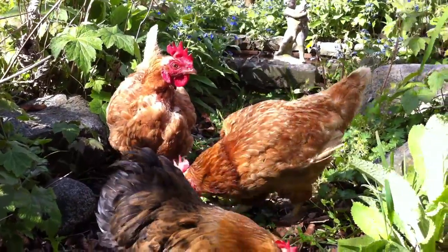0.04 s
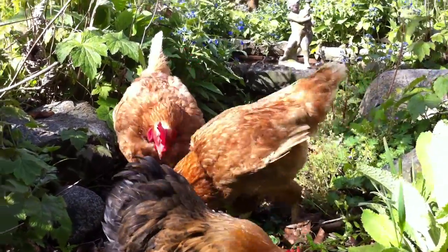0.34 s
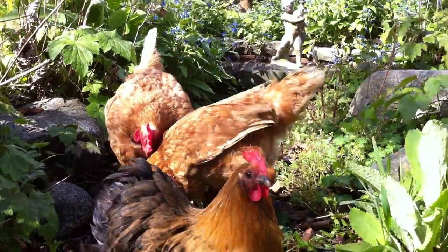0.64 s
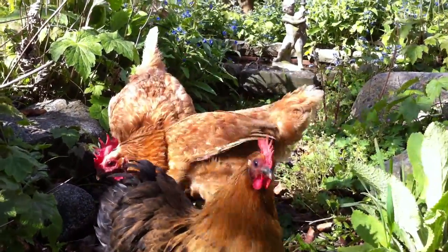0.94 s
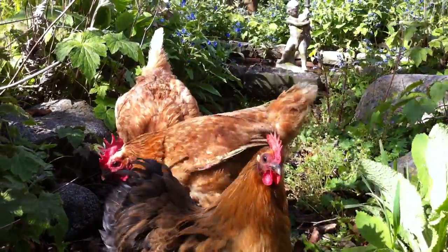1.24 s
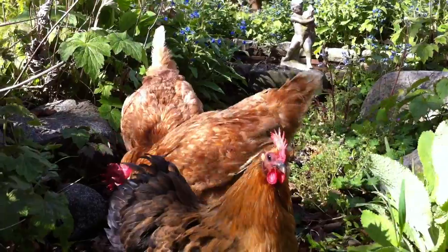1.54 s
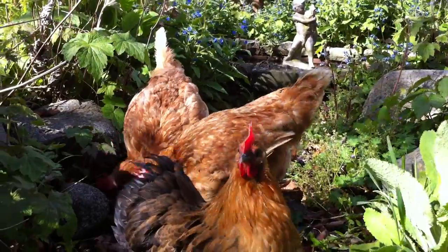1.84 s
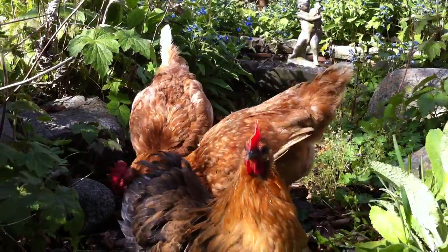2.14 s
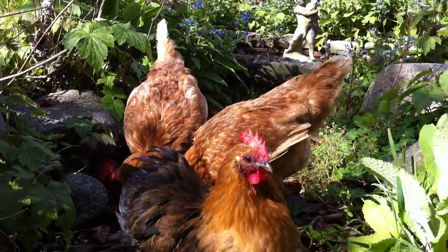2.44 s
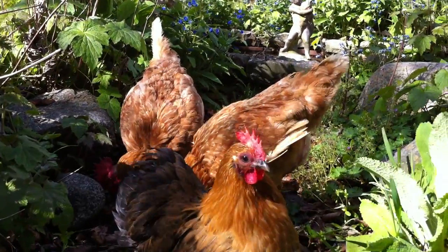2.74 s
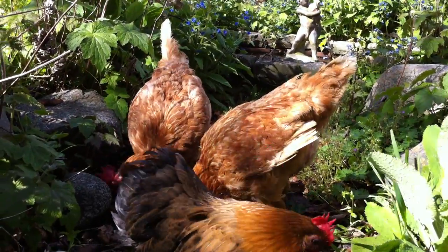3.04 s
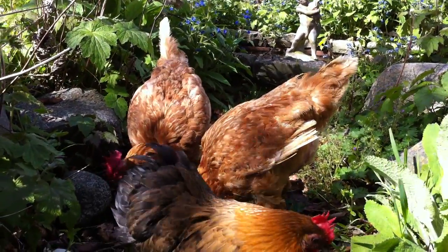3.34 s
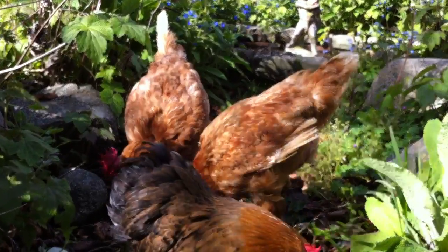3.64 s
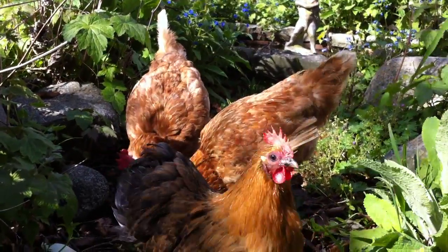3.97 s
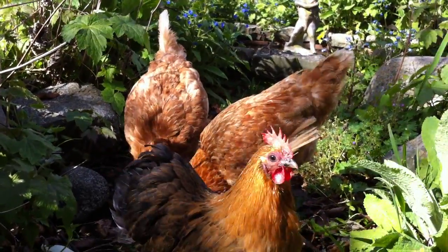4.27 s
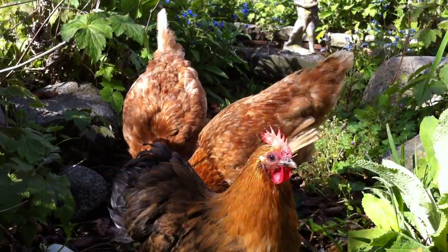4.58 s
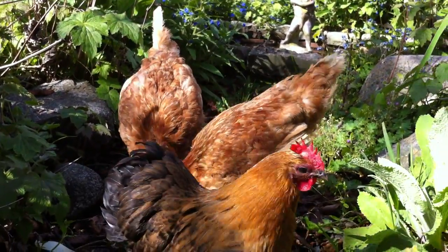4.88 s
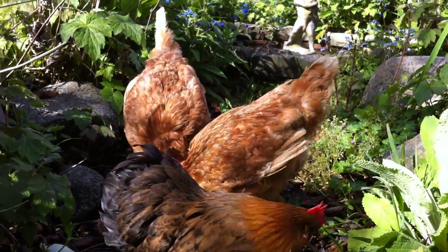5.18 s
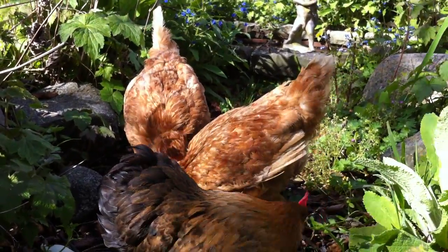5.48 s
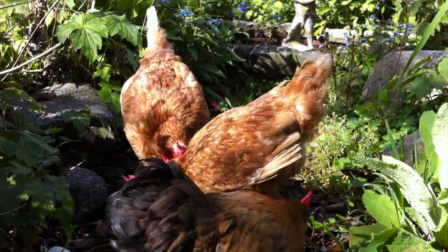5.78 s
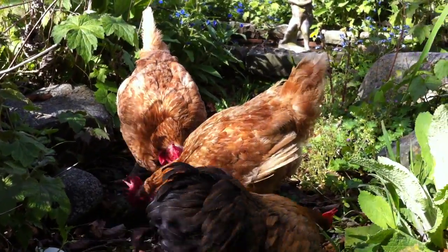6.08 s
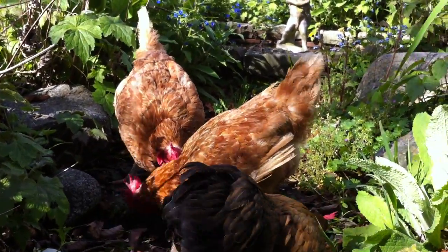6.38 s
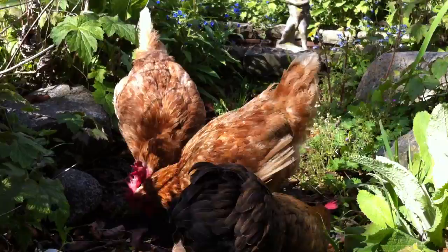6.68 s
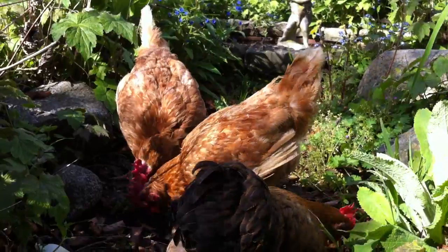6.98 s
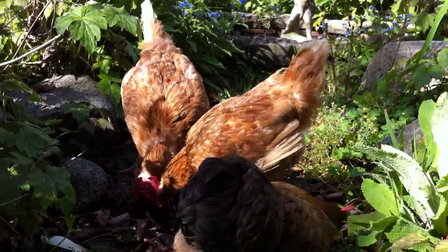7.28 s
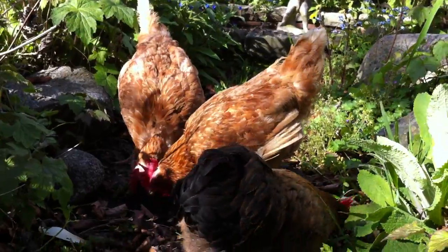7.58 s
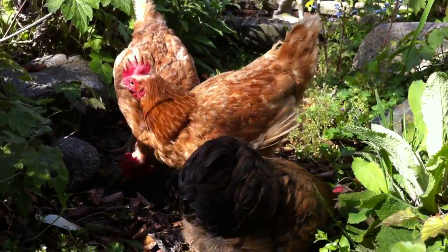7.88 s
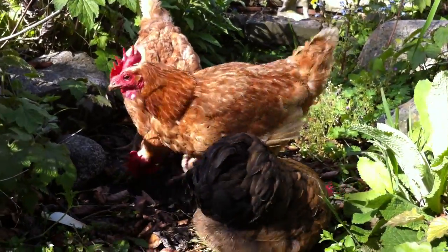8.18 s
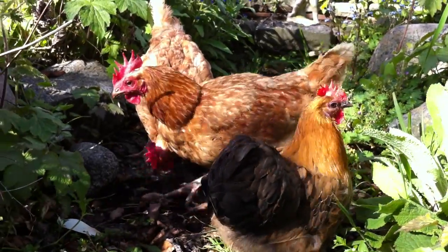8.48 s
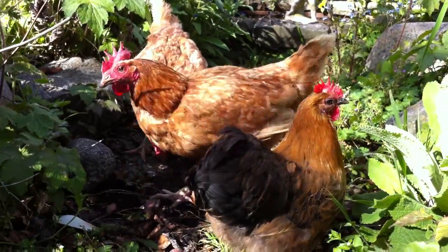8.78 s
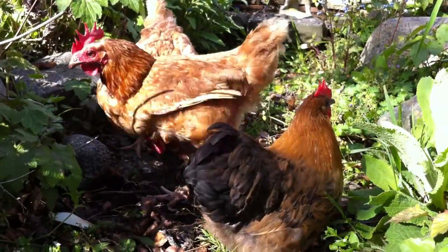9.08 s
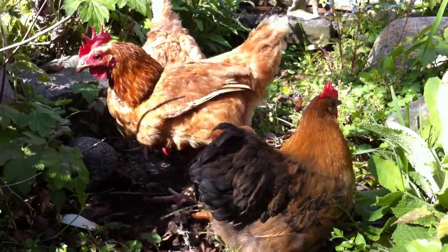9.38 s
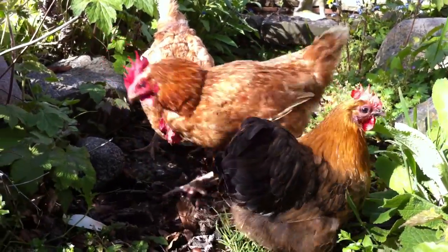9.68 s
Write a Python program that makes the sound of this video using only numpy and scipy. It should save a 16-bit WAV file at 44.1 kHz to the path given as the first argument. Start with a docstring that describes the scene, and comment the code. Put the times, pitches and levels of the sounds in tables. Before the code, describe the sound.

Hens feed in dry leaf litter in a garden, a step from a hand-held microphone, over soft outdoor air. For the first three seconds, light wind and handling make a run of low, dull thumps, while a faint, distant machine hum swells and holds. Around 1 second there is a crisp scratch and a sharp crack of a stalk, with a lighter brush of leaves near 2 seconds. From 3 to 5.4 seconds it is quiet, with soft rustling and an occasional tiny peck. Thumps return near 5.5 seconds and, more strongly, at 6.6 seconds; then the hum mostly fades. Small pecks and twig ticks are scattered from about 5.7 to 8 seconds. From 8.5 seconds until nearly 10, the hens rake hard in two short bouts, crackling the leaves, with brief ringing clicks of twigs and grit in the first.

```python
"""Hens feed in a garden, a step from a hand-held microphone. For the first three seconds light wind and
handling thump the microphone, while a far machine's hum swells and beaks and claws crack stalks and
scratch through dry leaves. After a stretch of soft rustling, thumps return near 5.5 and 6.6 s; then
the hum mostly fades. From 8.5 s the hens rake hard, crackling the leaves and making twigs and grit ring."""
import sys
import numpy as np
from scipy import signal
from scipy.fft import rfft, irfft
from scipy.io import wavfile
from scipy.ndimage import uniform_filter1d

SR = 44100
rng = np.random.default_rng(int(sys.argv[2]) if len(sys.argv) > 2 else 0)


def unload_audio(sound):
    """Save the sound as a 16-bit wav file, at the path given as the first command line argument."""
    columns = np.transpose(np.atleast_2d(sound))
    # keep every value between -1 and 1, then stretch to whole-number steps
    steps = np.round(np.clip(columns, -1, 1) * 32767)
    wavfile.write(sys.argv[1], SR, steps.astype(np.int16))


N = 433062
T = np.arange(N) / SR
HUM_FADE_AT_S, HUM_FADE_TAKES_S = 6.7, 0.26


def amp(db):
    """Decibels to gain."""
    return 10 ** (np.asarray(db) / 20)


def unit_rms(x):
    """Scales to rms 1."""
    return x / np.sqrt(np.mean(x ** 2) + 1e-20)


def level_at(spectrum, hz):
    """Level in dB of a spectrum table, its points joined on a log-frequency axis."""
    points_hz, db = np.transpose(spectrum)
    return np.interp(np.log(hz + 1), np.log(points_hz + 1), db)


def add(mix, at_s, sound):
    """Mixes a sound in at a time."""
    part = mix[max(round(at_s * SR), 0):][:len(sound)]
    part += sound[:len(part)]


def colour(x, spectrum, size=8192):
    """Minimum-phase filter with the shape of a spectrum table."""
    db = level_at(spectrum, abs(np.fft.fftfreq(size, 1 / SR)))
    log_gain = np.log(amp(np.maximum(db - db.max(), -90)))
    response = np.exp(np.conj(signal.hilbert(log_gain)))
    taps = np.fft.ifft(response).real[:size // 2]
    return signal.oaconvolve(x, taps)[:len(x)]


def band(x, hz, kind, order=2):
    """Butterworth filter."""
    sections = signal.butter(order, np.clip(hz, 5, SR / 2 - 500), kind, fs=SR, output="sos")
    return signal.sosfilt(sections, x)


def low_part(x, hz):
    """Everything below hz, with no delay."""
    return irfft(rfft(x) / (1 + (np.fft.rfftfreq(N, 1 / SR) / hz) ** 4), N)


def wander(rate_hz):
    """Smooth random drift of rms 1."""
    hz = np.fft.rfftfreq(N, 1 / SR)
    return unit_rms(irfft(rfft(rng.standard_normal(N)) * np.exp(-(hz / rate_hz) ** 2), N))


def grains(per_s, spread_db):
    """Random clicks of either sign and uneven size."""
    size = amp(spread_db * np.minimum(rng.exponential(1, N), 4))
    return unit_rms(size * rng.choice([-1, 1], N) * (rng.random(N) < per_s / SR))


def ramp(at_s, takes_s):
    """Goes from 0 to 1 around at_s."""
    return np.clip((T - at_s) / takes_s + .5, 0, 1)


def envelope(at_s, hold_s, rise_s, fall_s):
    """Gain that rises to 1 at at_s, holds, then dies away."""
    return np.exp(-np.maximum(at_s - T, 0) / rise_s - np.maximum(T - at_s - hold_s, 0) / fall_s)


def stroke_power(at_s, hold_s, db, rise_s, fall_s, tail_db, tail_s):
    """Power of one gust or scratch: attack, hold, quick release and a weaker, longer tail."""
    stroke = envelope(at_s, hold_s, rise_s, fall_s)
    tail = amp(tail_db) * envelope(at_s, hold_s, rise_s, tail_s)
    return (amp(db) * np.maximum(stroke, tail)) ** 2


# Open garden air, all around the microphone: (frequency [Hz], relative level [dB])
AIR_SPECTRUM = [(25, -38), (60, -26), (100, -12), (145, -5), (190, 0), (230, -7.5), (300, -11),
                (480, -19.5), (700, -22.5), (1050, -20.5), (1800, -25.5), (2400, -32), (6500, -39),
                (15600, -45.5)]
def garden_air(gain_db=-49, drone_db=-2, waver_db=1.2, drop_db=-1.5):
    """Steady outdoor air with a wavering low drone that eases as the machine fades."""
    air = amp(gain_db) * unit_rms(colour(rng.standard_normal(N), AIR_SPECTRUM))
    drone = low_part(air, hz=400)
    faded = ramp(HUM_FADE_AT_S, HUM_FADE_TAKES_S)
    return air - drone + drone * amp(drone_db + waver_db * wander(10) + drop_db * faded)


# A motor, far off: (multiple of the turning rate, rms level [dB], change as it fades [dB])
MOTOR_ORDERS = [(2, -53.5, -7), (3, -50, -14.5)]
def far_machine(turning_hz=85.35, drift=0.0036, start_db=-12, swell_s=1.3, waver_db=1):
    """Low orders of a slightly unsteady motor; the hum swells, holds, then mostly fades."""
    angle = 2 * np.pi * np.cumsum(turning_hz * (1 + drift * wander(3.2))) / SR
    swell = amp(start_db * np.maximum(1 - T / swell_s, 0))
    faded = ramp(HUM_FADE_AT_S, HUM_FADE_TAKES_S)
    hum = sum(amp(db + drop_db * faded + waver_db * wander(4.4)) * np.sin(order * angle)
              for order, db, drop_db in MOTOR_ORDERS)
    return np.sqrt(2) * swell * hum


# Wind right on the microphone: (frequency [Hz], relative level [dB])
WIND_SPECTRUM = [(25, -50), (50, -27), (80, -10), (120, -2.5), (170, 1.5), (260, -2.5), (380, -14),
                 (600, -24), (900, -29.5), (1600, -46), (4000, -79)]
# Gusts reaching the microphone: (time [s], length [s], level [dB])
WIND_GUSTS = [(0.093, 0.18, -37.5), (0.42, 0.31, -40.5), (0.803, 0.44, -36.5), (1.144, 0.2, -35),
              (1.376, 0.375, -38), (1.835, 0.19, -34.5), (2.118, 0.21, -42.5), (2.423, 0.21, -39),
              (2.667, 0.61, -45.5), (5.41, 0.22, -40.5), (6.607, 0.054, -37)]
def wind_buffets(gain_db=-1, lump_db=2.5, harshness=0.22):
    """Eddies strike the microphone as a patter of dull pushes; the harder ones are also brighter."""
    lumps = amp(lump_db * np.clip(wander(56), -2, 1.3))
    pushes = unit_rms(colour(grains(per_s=770, spread_db=1) * lumps, WIND_SPECTRUM))
    low = low_part(pushes, hz=270)
    # The tail is the weaker eddies that each gust leaves behind.
    force = np.sqrt(sum(stroke_power(*gust, rise_s=0.033, fall_s=0.06, tail_db=-14.5, tail_s=0.26)
                        for gust in WIND_GUSTS))
    brightness = (lumps * force / amp(-46)) ** harshness
    return amp(gain_db) * force * (low + (pushes - low) * brightness)


# Bumps on the camera body, at the microphone: (time [s], peak level [dB], nominal brightness [Hz])
BODY_BUMPS = [(0.144, -23, 384), (0.209, -26, 337), (0.251, -25.5, 370), (0.27, -20.5, 344),
              (0.286, -27, 300), (0.527, -22.5, 385), (0.845, -32, 169), (0.864, -34, 338),
              (0.958, -22, 360), (0.986, -19.5, 440), (1.07, -21.5, 262), (1.176, -21, 420),
              (1.239, -19, 212), (1.263, -18.5, 190), (1.293, -21, 320), (1.327, -26, 320),
              (1.495, -20.5, 308), (1.575, -27.5, 290), (1.641, -22, 300), (1.815, -23.5, 228),
              (1.882, -28, 288), (1.926, -14.5, 390), (1.956, -21.5, 220), (1.986, -23.5, 260),
              (2.027, -22, 230), (2.065, -24.5, 260), (2.105, -21.5, 205), (2.267, -21.5, 292),
              (2.408, -25.5, 220), (2.427, -26, 290), (2.506, -25, 250), (2.543, -23.5, 240),
              (2.618, -26.5, 248), (2.849, -28, 290), (2.975, -29, 238), (3.118, -27.5, 267),
              (5.405, -27, 229), (5.425, -26, 289), (5.546, -23.5, 330), (5.625, -31, 200),
              (5.65, -27.5, 269), (6.492, -29, 149), (6.605, -27, 239), (6.621, -20.5, 220),
              (6.636, -24, 240), (6.65, -13, 238), (6.661, -13.5, 225), (6.681, -28, 520),
              (7.04, -34.5, 160), (7.581, -36, 270), (8.033, -36, 170)]
def handling_bumps(sharpness=0.88, low_cut_hz=145, scuff_db=-6.5, scuff_s=0.009):
    """Each bump is a soft push amid a brief scuff; the microphone's low cut makes it swing briefly."""
    out, impulse = np.zeros(N), signal.unit_impulse(4096, 1024)
    t = (np.arange(len(impulse)) - impulse.argmax()) / SR
    for at_s, db, hz in BODY_BUMPS:
        scuff = rng.standard_normal(len(t)) * np.exp(-(t / scuff_s) ** 2)
        force = impulse + amp(scuff_db) * scuff / np.linalg.norm(scuff)
        push = band(force, hz * sharpness, "lowpass")
        push = band(push, hz * sharpness * 2.31, "lowpass", order=4)
        push = band(push, low_cut_hz, "highpass", order=4)
        strength = abs(signal.hilbert(push))
        add(out, at_s - strength.argmax() / SR, amp(db) * push / strength.max())
    return out


def foliage_scatter(x, wet_db=-14, t60_s=0.1):
    """Stones and plants around the hens scatter a short, thin tail."""
    t = np.arange(SR // 2) / SR
    tail = rng.standard_normal(len(t)) * amp(-60 * t / t60_s) * (t > .004)
    return x + amp(wet_db) * signal.oaconvolve(x, tail / np.linalg.norm(tail))[:N]


# Peaks and hollows from the ground between hens and microphone: (frequency [Hz], level [dB])
GROUND_RIPPLE = [(950, 0), (1370, -6.5), (1800, 5), (2270, -6.5), (3100, 3), (3780, -5.5), (4350, 2),
                 (4900, 3), (5370, -2.5), (6000, 1), (6800, 4.5), (8100, -0.5), (10900, 4.5), (12050, -4),
                 (13300, 3.5), (14200, 1), (15050, -3)]
# Their change with the place of the feet: (time [s], frequency factor, depth factor, tilt [dB/octave])
FOOT_PLACES = [(1.1, 0.966, 0.55, 0.5), (8.7, 0.996, 1.05, 0.6), (9.4, 1.043, 0.96, 0.4)]
def ground_reflections(x):
    """Soil and stones hollow out the spectrum; the hollows slide and deepen as the feet move."""
    hz, t, spectra = signal.stft(x, SR, nperseg=512)
    times, *columns = np.transpose(FOOT_PLACES)
    shift, depth, tilt = (np.interp(t, times, column) for column in columns)
    octaves = np.log2(np.maximum(hz[:, None], 500) / 8000)
    ripple_db = depth * level_at(GROUND_RIPPLE, hz[:, None] / shift) + tilt * octaves
    return signal.istft(spectra * amp(ripple_db), nperseg=512)[1][:N]


# Dry leaves on the soil, a step away: (frequency [Hz], relative level [dB])
LEAF_SPECTRUM = [(200, -20.5), (900, 0), (4000, 1), (9000, 1), (15000, 1.5)]
def dry_leaves(drive):
    """Dry leaves answer a touch brightly, with little bass."""
    return colour(drive, LEAF_SPECTRUM)


def soil_crumbs(gain_db=-81, rise_s=0.004, decay_s=0.008, restless_at_s=6.1, restless_db=12.5):
    """Crumbs of soil patter softly on the leaves, more strongly once the hens grow restless."""
    restless = amp(restless_db * ramp(restless_at_s, takes_s=1))
    t = np.arange(2048) / SR
    landing = (1 - np.exp(-t / rise_s)) * np.exp(-t / decay_s)
    patter = signal.oaconvolve(abs(grains(per_s=41, spread_db=-1)), landing)[:N]
    fizz = band(dry_leaves(rng.standard_normal(N)), 4000, "highpass")
    return amp(gain_db) * unit_rms(patter * fizz) * restless


# Twigs and grit struck a step away: (time [s], peak level [dB], pitch [Hz])
TWIG_STRIKES = [(0.317, -45, 2550), (0.717, -48, 3280), (0.789, -47, 4520), (2.526, -55, 4620),
                (2.548, -53, 4650), (2.62, -51, 6200), (5.674, -52, 4050), (5.843, -42, 6560),
                (6.569, -43, 5980), (6.577, -43, 6000), (6.5975, -39.5, 5880), (6.9555, -46.5, 6850),
                (8.518, -32, 3100), (8.569, -31, 4400), (8.627, -30.5, 6550), (8.731, -31, 4980)]
def twig_clinks(rise_s=0.00035, ring_s=0.0019, mode_spread=0.062, second_db=-5):
    """A beak or claw glances off a dry twig or grit, which rings for an instant with two close modes."""
    out, t = np.zeros(N), np.arange(2048) / SR
    for at_s, db, hz in TWIG_STRIKES:
        second_hz = hz * (1 + mode_spread * rng.standard_normal())
        second = amp(second_db) * np.sin(2 * np.pi * (second_hz * t + rng.random()))
        modes = np.sin(2 * np.pi * hz * t) + second
        ring = modes * (1 - np.exp(-t / rise_s)) * np.exp(-t / ring_s)
        add(out, at_s, amp(db) * ring / abs(ring).max())
    return out


# Pecks and snapping stalks, a step away: (time [s], peak level [dB], nominal brightness [Hz])
PECKS = [(0.0615, -46, 13000), (0.326, -39.5, 6000), (0.7885, -37, 5600), (0.9535, -29, 10220),
         (1.004, -20.5, 9700), (1.378, -37, 7020), (1.6912, -40, 7800), (2.958, -42, 13100),
         (3.7724, -44.5, 10400), (4.6297, -51, 12000), (5.811, -40, 10400), (5.941, -36, 13700),
         (6.5975, -38, 8500), (6.7536, -43, 7970), (6.8988, -43, 6000), (7.279, -46.5, 10200),
         (7.505, -43, 12000), (7.6127, -38, 10800), (7.918, -37.5, 10500), (8.0083, -40, 12500),
         (8.4965, -31, 4500), (9.326, -30.5, 4930), (9.649, -31, 6660)]
def pecking(rise_s=0.0011, decay_s=0.0012, settle_db=-20, settle_s=0.016):
    """A beak or claw breaks a stalk: a sharp crack, then crumbs settling."""
    out, t = np.zeros(N), np.arange(4096) / SR
    attack = 1 - np.exp(-t / rise_s)
    decay = np.exp(-t / decay_s) + amp(settle_db) * np.exp(-t / settle_s)
    for at_s, db, hz in PECKS:
        crack = band(rng.standard_normal(len(t)) * attack * decay, [hz * 0.63, hz * 1.95], "bandpass")
        add(out, at_s, amp(db) * crack / abs(crack).max())
    return out


def leaf_crackles(per_s, spread_db, ring_s):
    """Dry leaves crack one by one, each ringing for an instant at a pitch of its own."""
    when, pitch, size, phase = rng.random((round(per_s * N / SR), 4)).T
    age = np.arange(128)  # samples since the crack
    hz = 2500 + 13000 * pitch
    gain = amp(spread_db * np.minimum(-np.log(1 - size), 4))
    tones = np.sin(2 * np.pi * (hz[:, None] * age / SR + phase[:, None]))
    rings = gain[:, None] * np.exp(-age / SR / ring_s) * tones
    positions = (when * N).astype(int)[:, None] + age
    return unit_rms(np.bincount(positions.ravel(), rings.ravel(), N)[:N])


def leaf_patches(x, patch_db):
    """Each leaf touched rings differently: patches of colour come and go."""
    spectra = signal.stft(x, nperseg=256, noverlap=192)[2]
    patches = rng.standard_normal(spectra.shape[::-1]).T
    patches = uniform_filter1d(patches, size=4, axis=0)  # across frequency
    patches = unit_rms(uniform_filter1d(patches, size=36, axis=1))  # across time
    return signal.istft(spectra * amp(patch_db * patches), nperseg=256, noverlap=192)[1][:N]


# A foot or body brushing the leaves, a step away: (time [s], level [dB], rise [s], fall [s])
LEAF_BRUSHES = [(0.32, -54.5, 0.067, 0.11), (0.71, -54, 0.12, 0.051), (1.38, -54, 0.31, 0.25),
                (1.79, -48.5, 0.057, 0.028), (2.175, -43, 0.028, 0.054), (3.14, -58.5, 0.14, 0.22),
                (5.675, -49, 0.042, 0.014), (5.98, -57, 0.31, 0.17), (6.97, -57.5, 0.057, 0.067),
                (7.98, -60, 0.083, 0.17), (8.3, -54.5, 0.061, 0.11), (8.94, -54.5, 0.039, 0.033),
                (9.124, -47, 0.042, 0.088)]
# A claw dragged through the same leaves: (time [s], length [s], level [dB], time to bite [s])
CLAW_SCRATCHES = [(0.955, 0.005, -41, 0.0018), (1.018, 0.1, -39, 0.0092), (1.16, 0.1, -43.5, 0.037),
                  (8.512, 0.06, -37, 0.02), (8.6, 0.11, -40.5, 0.015), (8.722, 0.02, -35, 0.011),
                  (9.328, .018, -39.5, 0.0071), (9.385, 0.029, -40.5, 0.011), (9.416, 0.033, -30.5, 0.025),
                  (9.49, 0.14, -46, .01), (9.65, 0.15, -45, 0.0034)]
def footwork(stir_db=-57, stir_fade_s=1.9):
    """How hard the leaves are stirred: scratches, brushes and a light rustle add in power."""
    # The claw lets go quickly; the tail is the thrown leaves settling.
    claws = sum(stroke_power(*scratch, fall_s=0.014, tail_db=-5, tail_s=0.051)
                for scratch in CLAW_SCRATCHES)
    brushes = sum((amp(db) * envelope(at_s, 0, rise_s, fall_s)) ** 2
                  for at_s, db, rise_s, fall_s in LEAF_BRUSHES)
    stir = amp(stir_db) * np.exp(-T / stir_fade_s)  # dies away as the hens settle to feed
    return np.sqrt(claws + brushes + stir ** 2)


def raking(clump_db=1.7, crackle_gain=0.45):
    """Under the hens' feet, countless tiny fractures come in clumps while larger leaves crackle."""
    fizz = grains(per_s=14000, spread_db=-1)
    crackle = crackle_gain * leaf_crackles(per_s=2200, spread_db=4.5, ring_s=0.00055)
    fractures = (fizz + crackle) * amp(clump_db * wander(61))
    rustle = leaf_patches(dry_leaves(fractures), patch_db=1)
    return unit_rms(ground_reflections(rustle)) * footwork()


def scene():
    """Hens close by among the plants, the garden behind them, and thumps at the microphone; mono."""
    hens = foliage_scatter(raking() + pecking() + twig_clinks() + soil_crumbs())
    return (hens + garden_air() + far_machine() + wind_buffets() + handling_bumps())[None]


def record(dry, edge_hz=15800):
    """The recorder cuts off the highest treble steeply."""
    taps = signal.firwin(1023, edge_hz, window=("kaiser", 9), fs=SR)
    return signal.oaconvolve(dry, taps[None], "same")


dry = scene()
out = record(dry)
unload_audio(out)
```